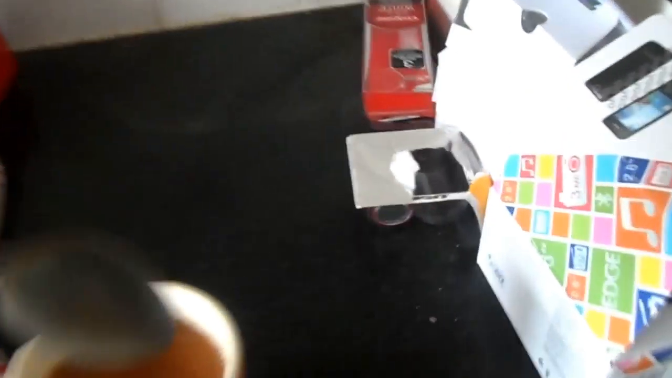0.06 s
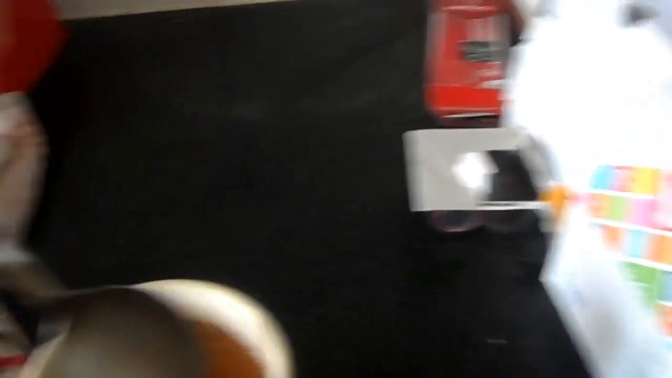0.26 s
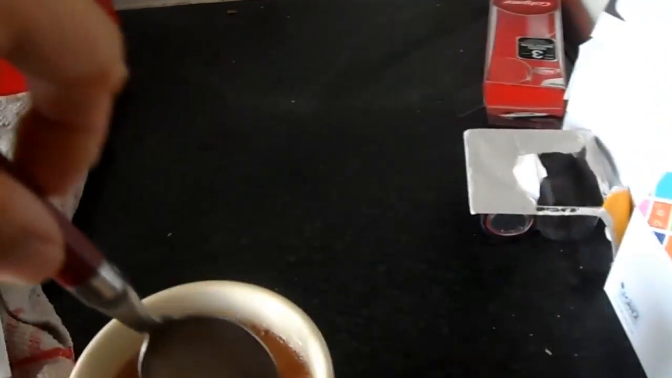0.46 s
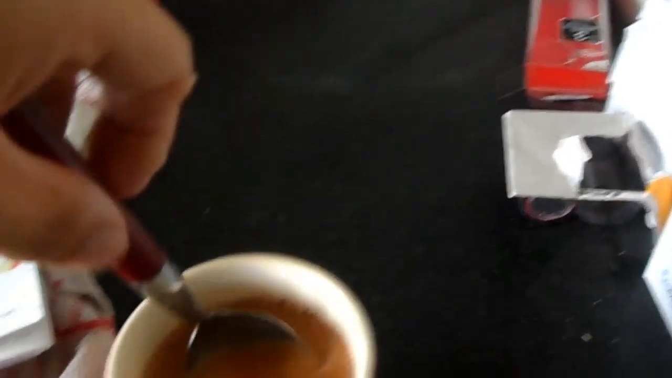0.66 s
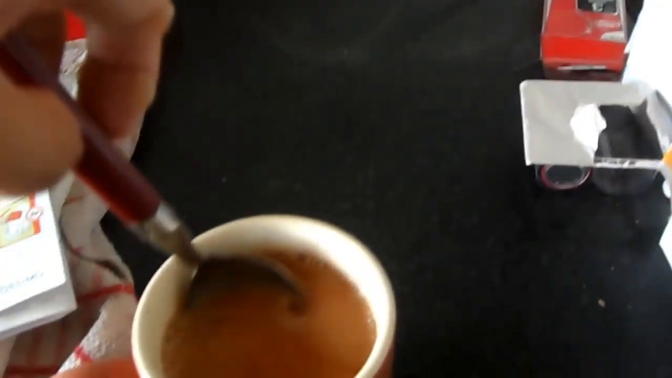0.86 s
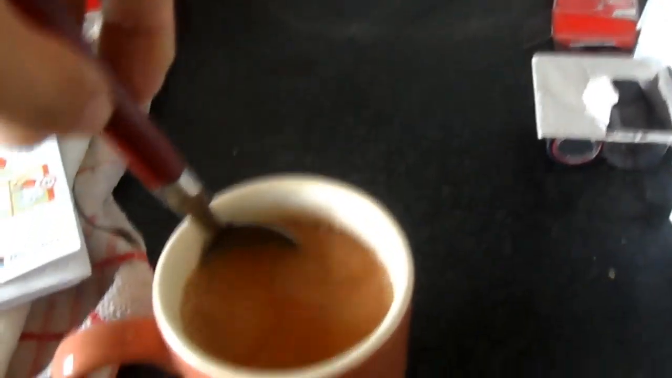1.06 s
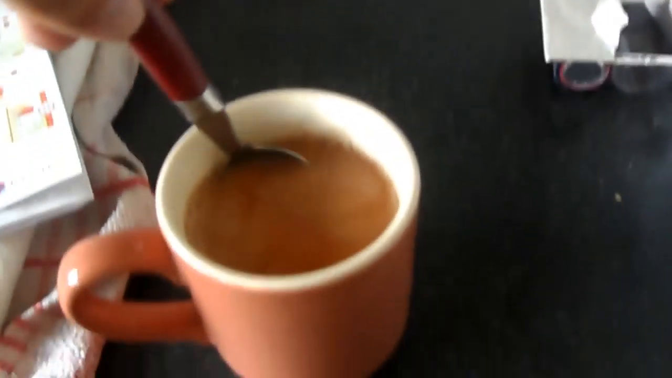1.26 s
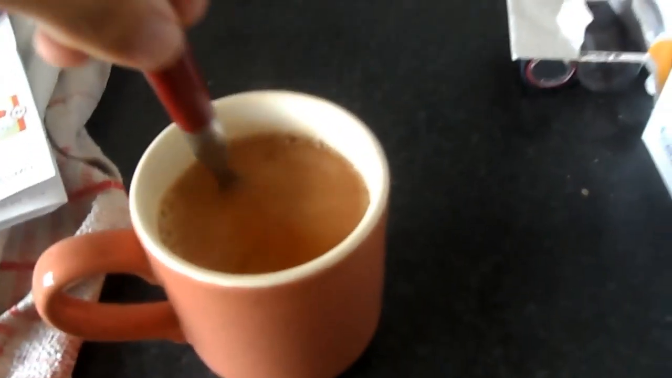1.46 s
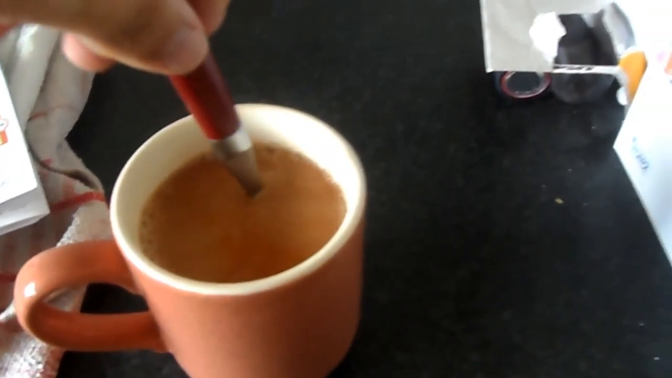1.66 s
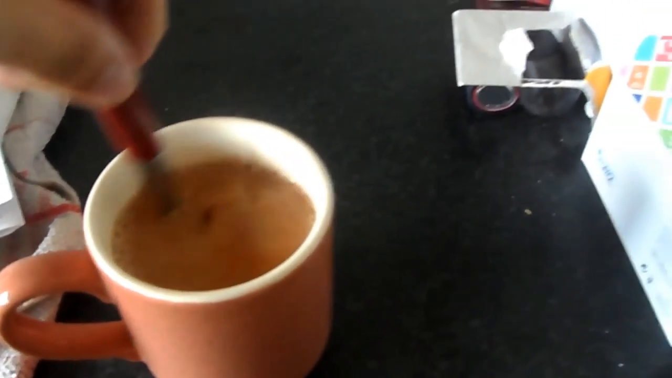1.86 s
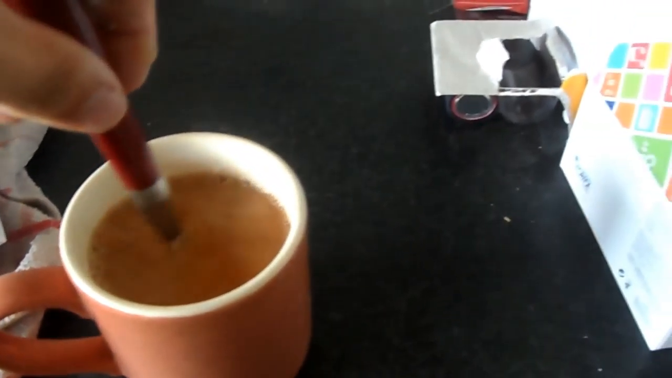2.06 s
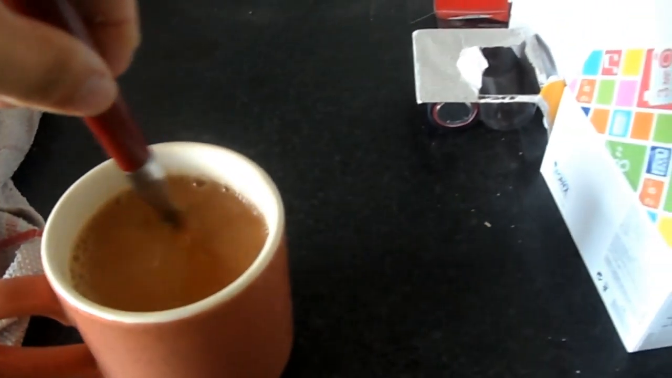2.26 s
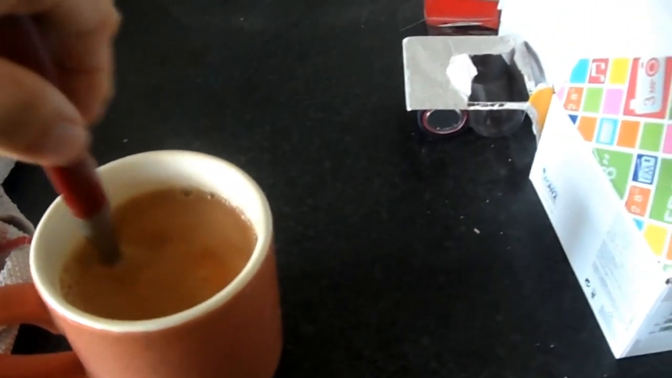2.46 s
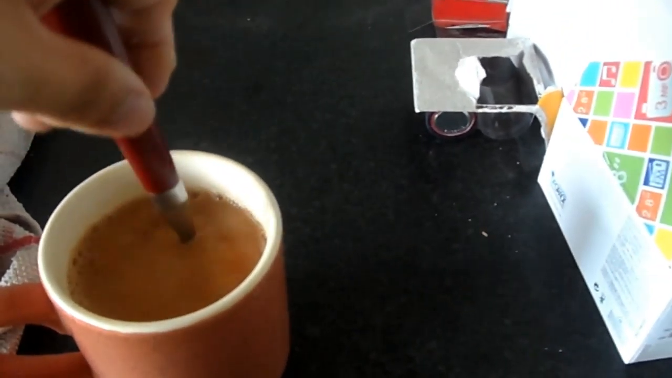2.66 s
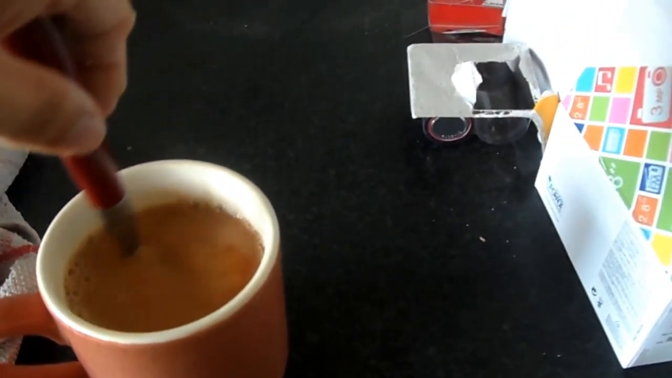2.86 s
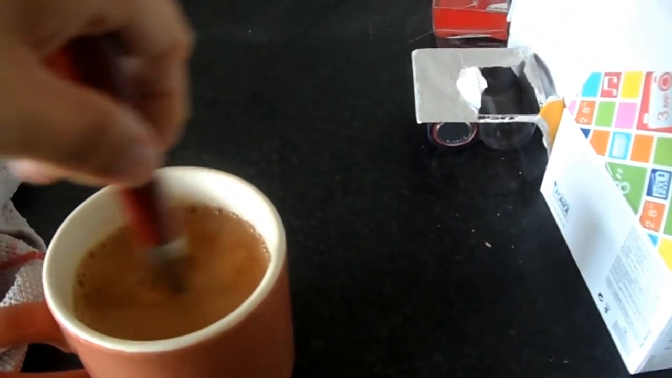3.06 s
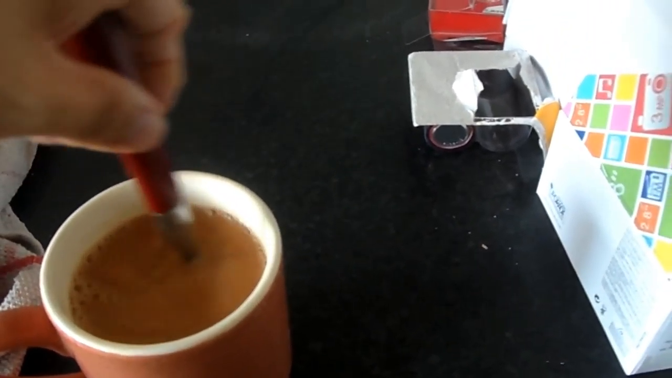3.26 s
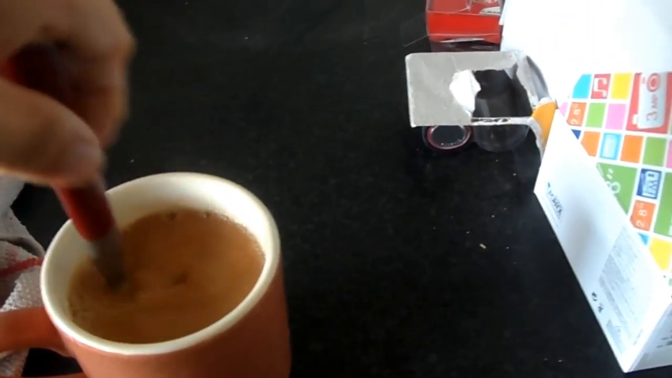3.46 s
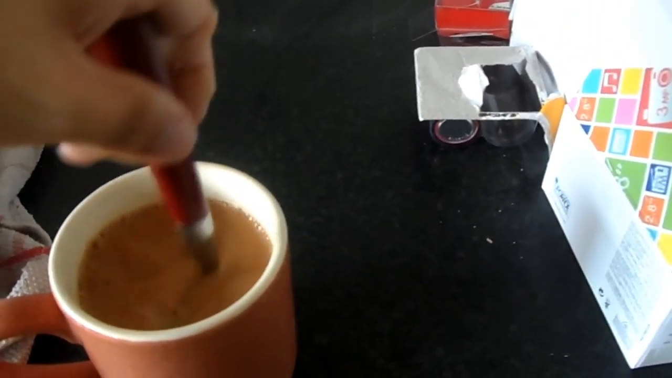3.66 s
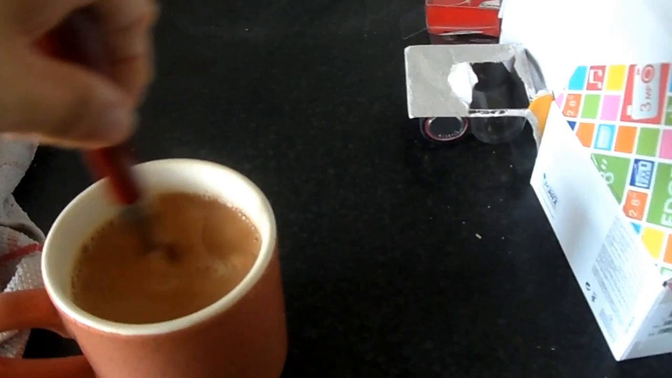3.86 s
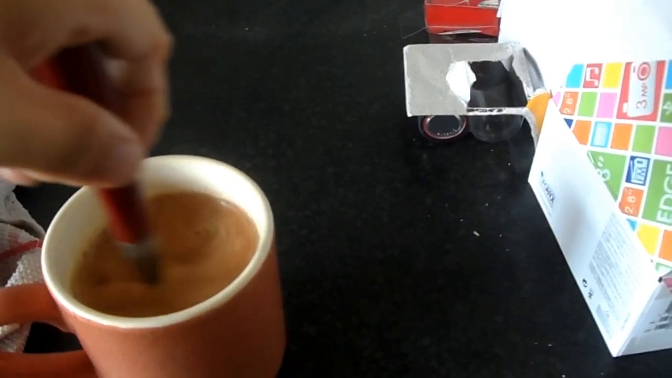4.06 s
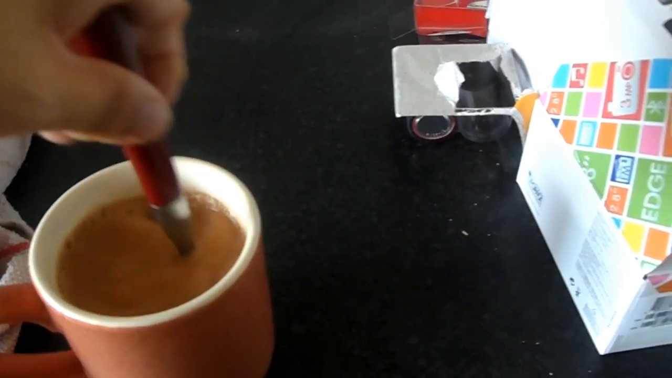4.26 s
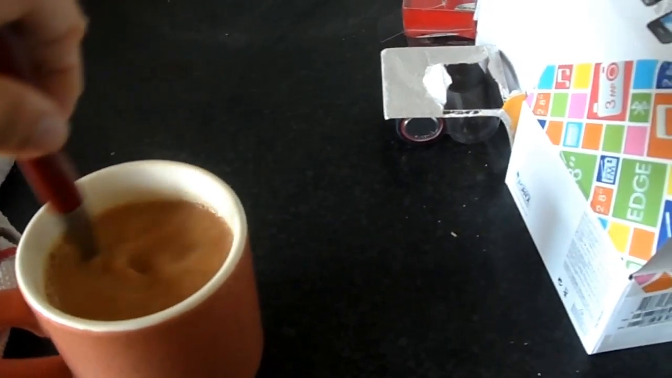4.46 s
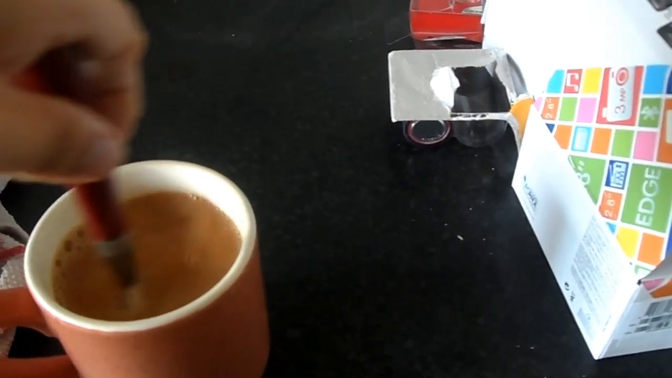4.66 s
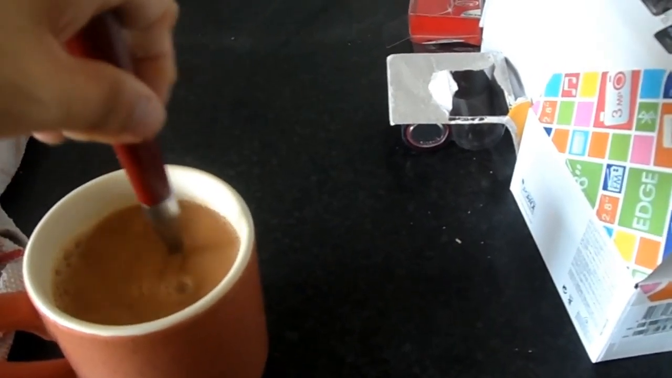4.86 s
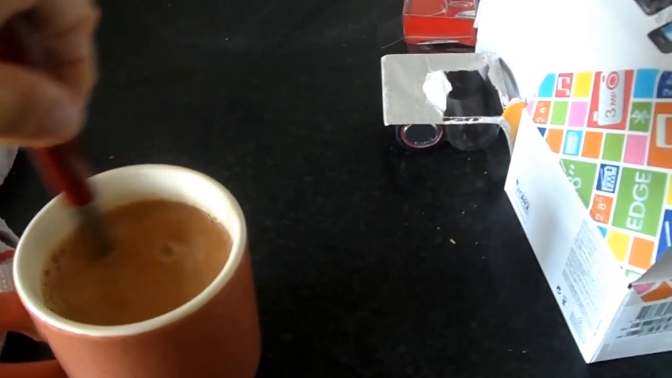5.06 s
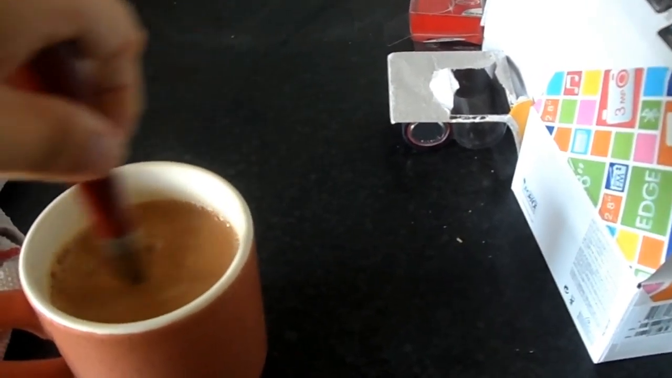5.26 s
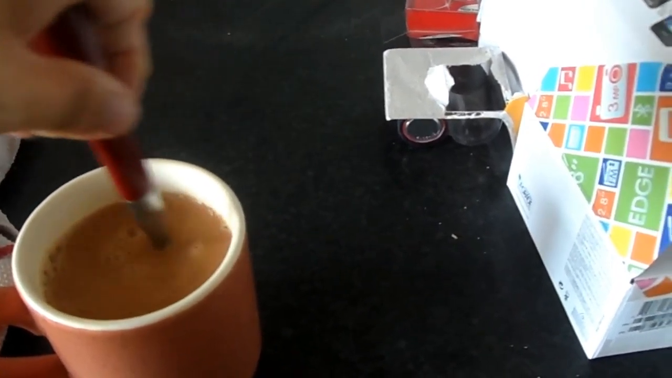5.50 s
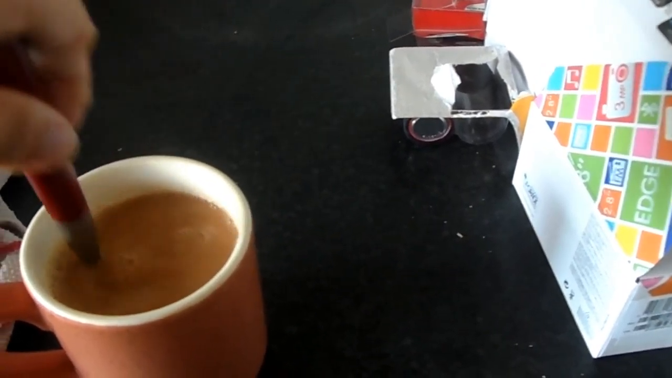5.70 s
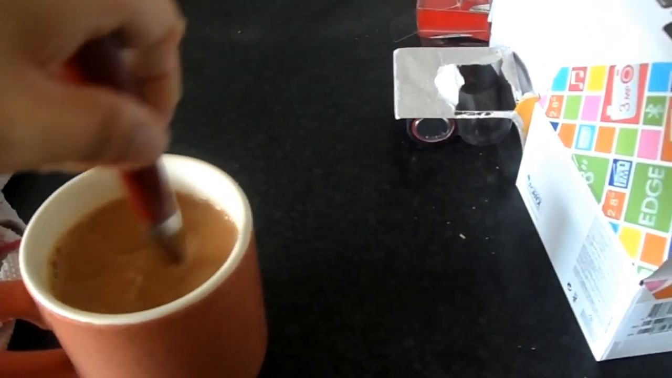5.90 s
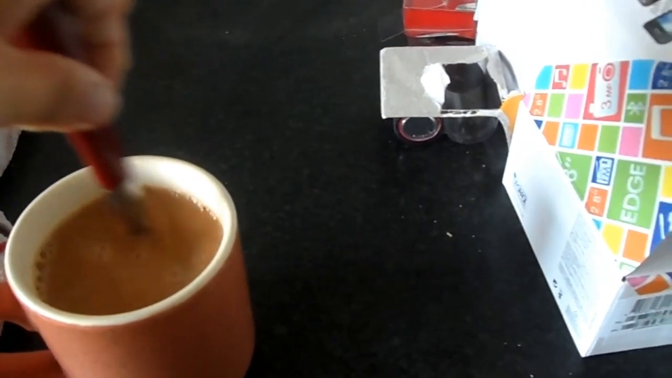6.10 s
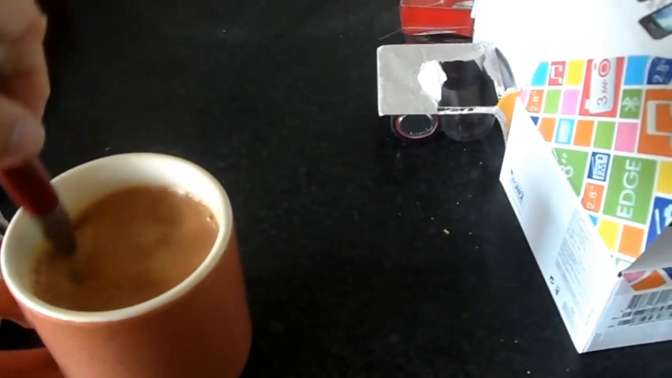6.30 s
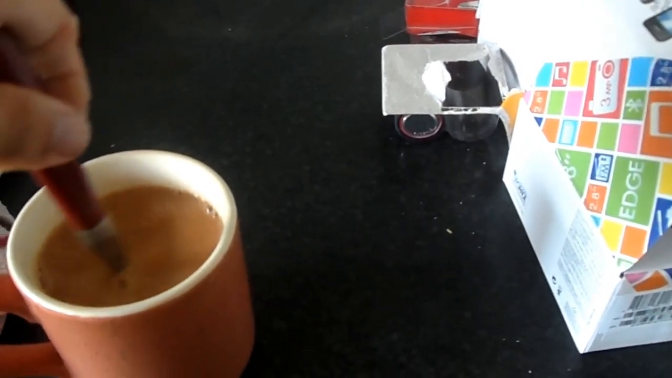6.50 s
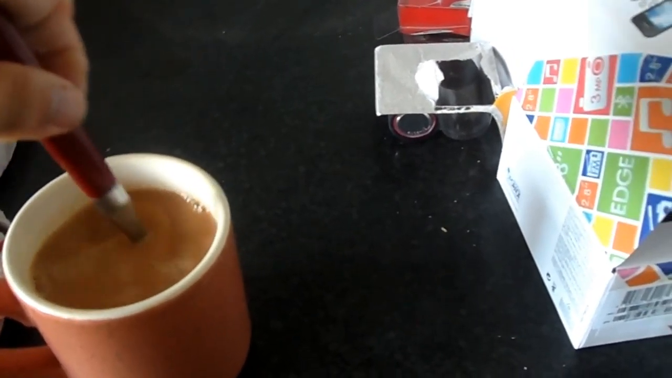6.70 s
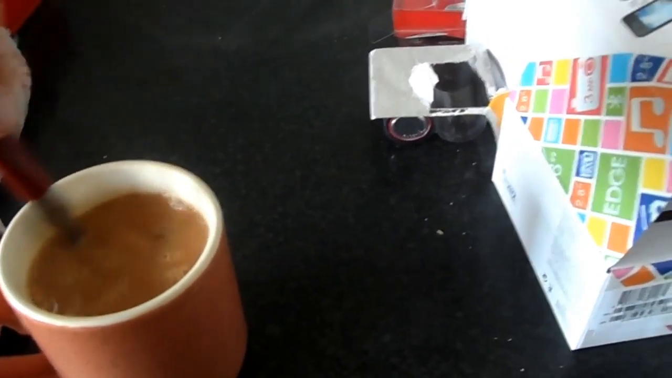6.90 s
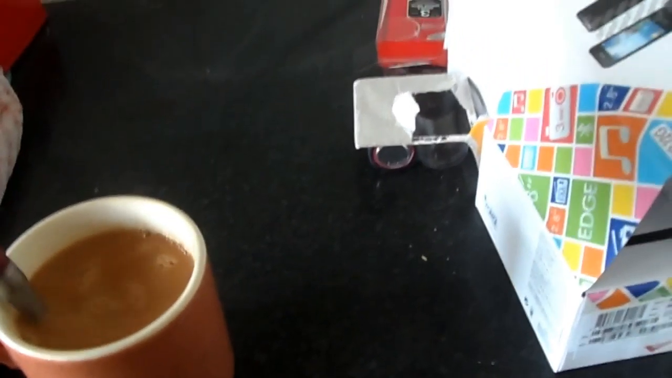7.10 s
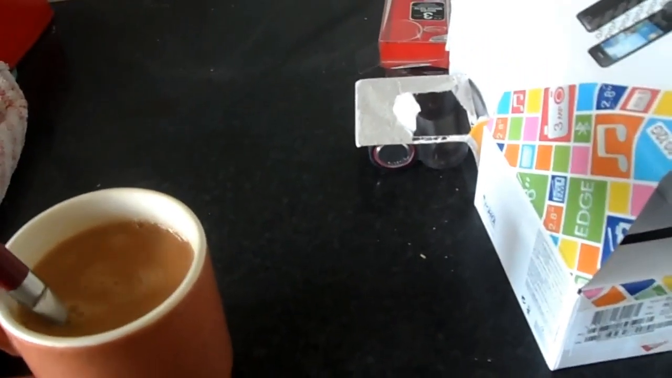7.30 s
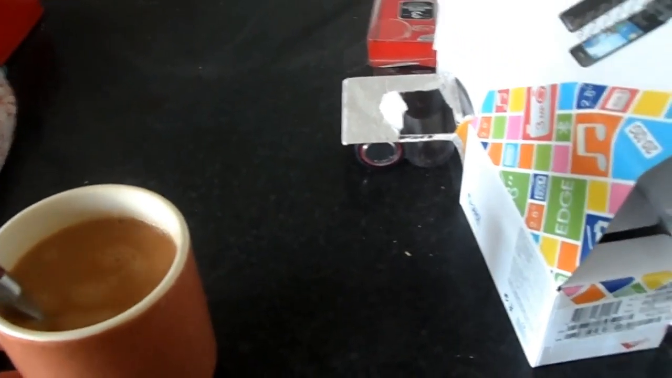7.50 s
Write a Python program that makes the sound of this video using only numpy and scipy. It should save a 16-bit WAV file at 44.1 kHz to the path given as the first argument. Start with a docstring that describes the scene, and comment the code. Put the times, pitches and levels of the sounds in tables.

```python
"""A teaspoon stirs a drink in a ceramic mug in a small kitchen, close to a mono microphone.
Each clink is modal synthesis: dying sines of mug and spoon, weighted by where the blow lands, with a noisy
crack and a rasping drag. Resonated blips and coloured noise make the drink gurgle and wash.
Before it, handling rustles and a growing rumble lead to a dull knock on the low modes of the house.
Filtered noise gives room hum, throbbing insects outside and faint wavering tones throughout."""
import sys
import numpy as np
from scipy import signal
from scipy.fft import rfft, irfft
from scipy.io import wavfile
from scipy.ndimage import uniform_filter1d

SR = 44100
rng = np.random.default_rng(int(sys.argv[2]) if len(sys.argv) > 2 else 0)


def inscribe(sig):
    """Save sig as 16-bit PCM at rate SR to the path in sys.argv[1].

    A 1-D sig is mono; a 2-D sig holds one channel per row.
    Samples are clipped to [-1, 1] before scaling.
    """
    pcm = np.round(np.clip(np.atleast_2d(sig).T, -1, 1) * 32767)
    wavfile.write(sys.argv[1], SR, pcm.astype(np.int16))


N = 332514


def gain_of(db):
    """Level law: decibels to an amplitude factor."""
    return 10 ** (np.asarray(db) / 20)


def evened(x):
    """Normalization: scales a signal to rms 1."""
    return x / np.sqrt(np.mean(x ** 2) + 1e-20)


def read(points, hz):
    """Interpolation: reads a table on a log-frequency axis."""
    f, value = np.transpose(points)
    return np.interp(np.log(hz + 1), np.log(f + 1), value)


def noise(colour):
    """Spectral shaping: white noise filtered to a given spectrum, silent outside it, rms 1."""
    hz = np.fft.rfftfreq(N, 1 / SR)
    inside = (hz >= colour[0][0]) & (hz <= colour[-1][0])
    spectrum = rfft(rng.standard_normal(N)) * gain_of(read(colour, hz)) * inside
    return evened(irfft(spectrum, N))


def ring(x, hz, t60):
    """Damped resonance: a two-pole mode turns a unit click into a dying sine of height 1."""
    r, w = 10 ** (-3 / (t60 * SR)), 2 * np.pi * hz / SR
    return signal.lfilter([0, np.sin(w)], [1, -2 * r * np.cos(w), r * r], x)


def strike(s, db):
    """Impulsive excitation: a train of clicks."""
    x = np.zeros(N)
    x[np.round(np.asarray(s) * SR).astype(int)] = gain_of(db)
    return x


def fading(x, t60):
    """Exponential decay: a one-pole filter turns each click into a falling envelope."""
    return signal.lfilter([1], [1, -10 ** (-3 / (t60 * SR))], x)


def burst(s, db, rise_s, t60):
    """Rise and decay: an envelope with a straight rise, then a steady fall in dB."""
    t = np.arange(N) / SR - s
    rise = np.clip(t / max(rise_s, 1e-3), 0, 1)
    return rise * gain_of(db - 60 * np.maximum(t - rise_s, 0) / t60)


def add(mix, s, sound):
    """Superposition: mixes a sound in at a moment."""
    part = mix[round(s * SR):][:len(sound)]
    part += sound[:len(part)]


# room hum spectrum: f/Hz, relative spectral level/dB
HUM_SPECTRUM = [(12, -36.5), (20, -2.5), (55, -2.5), (76, -18.5), (113, -14), (203, -21.5), (240, -26),
                (355, -26.5), (1600, -38), (2120, -37.5), (3310, -40.5), (5620, -41), (15800, -45.5)]
# insect bands: f/Hz, width/Hz, level/dB
INSECT_BANDS = [(5140, 700, -74.5), (6300, 190, -69)]
# faint wavering tones: f/Hz, width/Hz, level/dB
FAINT_TONES = [(50, 39, -51), (2096, 110, -65.5), (2683, 5.7, -73.5), (11300, 30, -75)]
HUM_DB, THROB_HZ = -48, 22.7


def narrow_bands(bands, ring_factor):
    """Resonant filtering: noise through narrow modes wavers, more slowly the longer they ring."""
    return sum(gain_of(db) * evened(ring(rng.standard_normal(N), hz, ring_factor / width))
               for hz, width, db in bands)


def background():
    """Stationary noise: shaped hum and faint tones, with insect bands under amplitude modulation."""
    t = np.arange(N) / SR
    throb = (.5 + .5 * np.cos(2 * np.pi * THROB_HZ * t + .3)) ** 1.5
    insects = narrow_bands(INSECT_BANDS, 2.2) * evened(throb)
    tones = narrow_bands(FAINT_TONES, 2.9)
    return gain_of(HUM_DB) * noise(HUM_SPECTRUM) + insects + tones


# handling rustles: t/s, rise/s, rattle level/dB, hiss level/dB
RUSTLE_EVENTS = [(0.01, 0.042, -51, -49.5), (0.221, .005, -47, -45.5), (.285, 0.024, -54.5, -65)]
# low modes of the house: f/Hz, level relative to the blow/dB, T60/s
HOUSE_MODES = [(65, -5.5, 0.41), (145.5, 3.5, 0.24), (394, -32, 0.64), (552, -25.5, 0.4), (729, -18.5, 0.3),
               (924, -13.5, 0.25), (1614, -34, 0.37), (1920, -24.5, 0.33)]
# spectra of boom, rattle and hiss: f/Hz, relative spectral level/dB
BOOM_SPECTRUM = [(15, -70), (25, -14), (59, -3.5), (98, -5), (145, -4), (188, -10.5), (300, -14.5),
                 (390, -71), (660, -120)]
RATTLE_SPECTRUM = [(180, -81), (300, -4.5), (420, -2.5), (505, -10), (916, -9), (967, -9.5), (2920, -14),
                   (4000, -23), (5200, -23), (8800, -120)]
HISS_SPECTRUM = [(2120, -3), (3600, -7), (6230, -4), (8630, -5.5), (10100, -4), (13000, -11), (16000, -25)]
KNOCK_S, KNOCK_DB = .410, -2.5


def knock():
    """Modal excitation: one blow on the house, with boom, rattle and hiss; rustles and rumble precede it."""
    blow, t = strike([KNOCK_S], KNOCK_DB), np.arange(N) / SR - KNOCK_S
    swell = 1 - 0.89 * np.exp(-np.maximum(t, 0) / 0.02)  # the modes take a moment to swell
    modes = sum(gain_of(db) * ring(blow, hz, t60) for hz, db, t60 in HOUSE_MODES) * swell
    slap = noise(RATTLE_SPECTRUM) * fading(blow, 0.018) * gain_of(-9.5)
    rumble = gain_of(-35 + 25.5 * np.minimum(t, 0)) * (t < 0)  # grows 25.5 dB a second up to the knock
    boom = rumble + burst(KNOCK_S, db=-11.5, rise_s=0.013, t60=0.32)
    boom += burst(KNOCK_S, db=-38, rise_s=.05, t60=1.5)  # long after-boom
    rattle = burst(KNOCK_S, db=-15.5, rise_s=0.0032, t60=0.33)
    rattle += burst(KNOCK_S, db=-54, rise_s=0.054, t60=1.5)  # long after-rattle
    hiss = burst(KNOCK_S, db=-37, rise_s=0.0035, t60=0.16)
    hiss += burst(KNOCK_S, db=-30.5, rise_s=0.068, t60=0.31)  # late hiss
    for s, rise_s, rattle_db, hiss_db in RUSTLE_EVENTS:
        rattle += burst(s, rattle_db, rise_s, t60=0.5)
        hiss += burst(s, hiss_db, rise_s, t60=0.35)
    noises = noise(BOOM_SPECTRUM) * boom + noise(RATTLE_SPECTRUM) * rattle + noise(HISS_SPECTRUM) * hiss
    return modes + slap + noises


# how hard the drink is stirred up: t/s, relative level/dB
STIRRING = [(1.2, -79), (1.4, -67.5), (2.2, -67), (4.5, -52), (4.75, -51.5), (5.0, -56), (7.54, -52)]
# the spoon throws the drink at the wall: t/s, relative level/dB
WALL_SPLASHES = [(1.28, -50), (2.21, -37.5), (4.8, -36.5)]
# air pockets in the drink: f/Hz, width/Hz, relative level/dB
AIR_POCKETS = [(260, 42, 1.5), (431, 350, -13.5), (522.5, 39, -4.5), (744, 93, -4.5)]
# wash of the drink: f/Hz, relative spectral level/dB
WASH_SPECTRUM = [(120, -40.5), (200, -4), (337, -31), (501, -9.5), (643, -11), (1370, -9.5), (1660, -10),
                 (2090, -16.5), (3000, -33), (3900, -46.5), (6600, -120)]
SEEDS_PER_S, SEED_SPREAD_DB = 45, 5  # each air pocket answers about two seeds in three


def slosh():
    """Cavity resonance: random blips ring air pockets over a soft wash as the spoon turns."""
    seed_db = SEED_SPREAD_DB * np.minimum(rng.exponential(1, N), 3)
    seeds = gain_of(seed_db) * (rng.random(N) < SEEDS_PER_S / SR)
    gurgle = np.zeros(N)
    for hz, width, db in AIR_POCKETS:
        blips = seeds * rng.choice([-1, 0, 1], N)
        pocket = ring(ring(blips, hz, 1.8 / width), hz, 0.019)  # two resonators in a row round the onset
        gurgle += gain_of(db) * evened(pocket)
    at, level_db = np.transpose(STIRRING)
    stir = gain_of(np.interp(np.arange(N) / SR, at, level_db, left=-120, right=-120))
    stir += sum(burst(s, db, rise_s=0.012, t60=0.24) for s, db in WALL_SPLASHES)
    return (evened(gurgle) * gain_of(-2.0) + noise(WASH_SPECTRUM) * gain_of(-6.5)) * stir


PRESS_S, FREE_LENGTH = 0.057, 0.78  # the spoon then lets go, and the length factor is at least this


def dying(modes, t, length):
    """Modal decay: a sum of dying sines. Each mode's pitch and level vary slightly at random from blow
    to blow, and a close, weaker partner at a random spacing makes it beat."""
    hz, db, t60 = np.transpose(modes)[:, :, None]
    shift, weight, sign, split = rng.standard_normal((4, len(modes), 1))
    hz, db = hz * (1 + .0012 * shift), db + 1.5 * weight
    pressed = np.minimum(t, PRESS_S)
    scaled_s = pressed / max(length, .1) + (t - pressed) / max(length, FREE_LENGTH)
    fall = gain_of(-60 / t60 * scaled_s)
    partner = 0.3 * fall * np.sin(2 * np.pi * hz * (1 + 0.0056 * split) * t)
    pair = np.sin(2 * np.pi * hz * t) + partner
    return (np.sign(sign) * gain_of(db) * fall * pair).sum(0)


NODE_DB = -28  # what still rings at a node, as the contact is not a point


def rung(shapes, db, place_deg, share):
    """Mode shapes: a family rings loud for a blow at its crests and faint at its nodes."""
    waves, crest_deg, base_db, gained_db = np.transpose(shapes)
    crest = np.cos(waves * np.radians(place_deg - crest_deg))
    return db + base_db + gained_db * share + 10 * np.log10(crest ** 2 + gain_of(NODE_DB) ** 2)


# blows: t/s, crack level/dB, jolt of the mug on the counter level/dB, mug level/dB, place round wall/deg,
# height on wall (0 low - 1 rim), spoon level/dB, place round rim of its bowl/deg,
# lean (0 edge first - 1 flat), drag level after the blow/dB, ring length factor while the spoon is pressed;
# all levels are relative
BLOWS = [(1.287, -15.5, -39, -21.5, 288.0, 1, -46, 186.0, 0, -49, 0.76),
         (1.951, -13.5, -43.5, -18, 290.0, 0.46, -24, 324.0, 0.29, -25.5, 0.51),
         (2.2105, -1.0, -27, -15.5, 42.0, 0.011, -20.3, 346.0, 0.19, -28, 0.33),
         (2.2346, -33, -30, -26.5, 2.9, 0.26, -33.5, 4.0, 0.55, -27, 0.88),
         (2.4601, -2, -38, -16, 9.2, 0.34, -20.5, 144.0, 0.18, -25.5, 0.53),
         (2.7086, -8, -33, -19, 140.5, 0.41, -20.5, 6.5, 0.088, -26.5, 0.37),
         (2.7343, -38, -33.0, -25, 213, 0, -30, 198.0, 0.89, -29, 0.69),
         (2.942, -2, -35, -12, 66.7, 0.49, -21.5, 287, 0.27, -25, 0.82),
         (3.0938, -32.5, -37, -24.5, 108.0, 0.76, -29.5, 22.5, 0.85, -18, 0.35),
         (3.412, -5, -37, -6.5, 317.0, 0.77, -24.5, 90, 0.12, -24.5, 0.58),
         (3.6324, -49.0, -74, -43, 113, 0.44, -49.5, 123, 0.87, -21.0, 1),
         (3.707, -8.5, -37.5, -20, 31.6, 0.13, -25.0, 186.0, 0.4, -27, 0.96),
         (3.7424, -16.5, -35, -26, 312.0, 0.15, -35, 54, 0.93, -30, 0.96),
         (3.8185, -22, -38.5, -35.5, 110, 0.29, -48, 85, 0.66, -36, 0.3),
         (3.9646, -5, -31.5, -4, 38.7, 0.69, -22, 155.5, 0.072, -25.5, 0.42),
         (4.148, -26.5, -38, -30, 284.0, 0.58, -35.5, 244.0, 0.62, -28, 0.31),
         (4.2198, -8, -30, -14.5, 316.0, 0.29, -16.5, 93.5, 0.74, -27, 0.38),
         (4.2439, -30, -34.5, -23, 100, 0.15, -38, 332.0, 0.72, -41, 0.87),
         (4.4292, -13.5, -28.5, -19.5, 288.0, 0.44, -34, 108.0, 0.56, -29.5, 0.4),
         (4.4476, -4.0, -49, -10.5, 38.9, 0.55, -28.5, 320, 0.49, -25, 0.48),
         (4.5107, -32, -31, -28.5, 240, 0.58, -39.5, 152.0, 0.37, -21.5, 0.28),
         (4.6686, -34.5, -34, -24.5, 290.0, 0.66, -33.5, 104.0, 0.066, -20.5, 0.14),
         (4.78, -5.5, -26, -18, 41, 0.1, -17, 200.0, 0.51, -27.5, 0.27),
         (4.8094, -36, -27.5, -18, 286.0, 0.7, -36.5, 53, 0.49, -24, 0.52),
         (5.1558, 0.5, -29.5, 0, 114.0, 0.48, -15.5, 98, 0.25, -27, 0.43),
         (5.409, -3.5, -28, -17.4, 316.0, 0.16, -15.5, 197, 0.43, -32, 0.49),
         (5.5082, -11.5, -34.5, -22.5, 104.0, 0.9, -36.5, 142, 0.4, -24.5, 0.66),
         (5.674, -0.5, -35, -2.5, 210.0, 0.57, -14, 150, 0.057, -27.5, 0.39),
         (5.9314, -11.5, -29, -14, 37.6, 0.14, -15.5, 198.2, 0.39, -24, 0.58),
         (6.0286, -11.5, -29.5, -19.5, 282.0, 0.41, -33, 166.0, 0.73, -26.5, 0.22),
         (6.2112, -3, -32.5, -5.5, 77.5, 0.6, -17.5, 216, 0.46, -26.5, 0.35),
         (6.5165, -5.5, -33, -24, 264.0, 0.6, -26.5, 18.0, 0.26, -25, 0.46),
         (6.596, -23, -34.5, -33, 11, 0.55, -37, 152.0, 0.5, -26, 0.24),
         (6.6664, -46, -34.5, -32, 288.0, 0.81, -46.5, 256.0, 1, -21, 0.31),
         (6.78, -40.5, -31, -44.5, 110, 0.9, -61.5, 320, 0.65, -28.5, 0.24),
         (6.9274, -12, -37, -11, 79, 0.65, -21.5, 29, 0.75, -27.5, 0.38),
         (7.0879, -26, -37.5, -23.5, 286.0, 0.78, -38.5, 97, 0.36, -19.0, 0.32),
         (7.2562, -6, -46, -22.1, 154.0, 0.93, -36.5, 88.0, 0.41, -27.5, 0.53),
         (7.2994, -26, -49, -32.3, 156.0, 0.75, -45, 200, 0.34, -22, 0.76),
         (7.3865, -42.0, -42.5, -43, 168.0, 0.57, -53.5, 285, 0.5, -13.5, 0.76),
         (7.4283, -23, -44, -40, 348.0, 0.63, -53, 260, 0.57, -39, 0.27),
         (7.4572, -50.0, -26, -39, 286.0, 0.77, -52.8, 71, 0.73, -23.0, 0.3)]
# families of mug modes, each rung together from one spot: f/Hz, relative level/dB, T60 before length factor/s
MUG_MODES = [
    [(1521, 2, .32)],
    [(1653, 2, .55)],
    [(3888, 3, .4), (3865, -4, .18)],
    [(4588, -3, .22), (4748, -12, .13), (6385, -5, .22), (7068, 1, .26), (10642, -6, .14)],
    [(6296, -4, .2), (6910, -2, .22), (6885, -10, .35), (7000, -12, .2), (8376, -26, .2)],
    [(7889, 1, .26), (7946, -8, .3), (7990, -10, .25)],
]
# families of spoon modes, deep in the drink: f/Hz, relative level/dB, T60 before length factor/s
SPOON_MODES = [
    [(2296, 0, .2), (7270, -4, .24), (7420, -8, .3), (7522, -2, .3)],
    [(3120, -8, .12), (3200, 0, .38)],
    [(3617, 0, .2)],
    [(5135, -2, .17), (5205, -3, .2)],
    [(8035, 1, .26), (9012, -4, .18), (9275, -5, .22), (9690, -6, .2), (9960, -2, .24), (10170, -8, .25)],
    [(10930, -6, .2), (11155, -6, .2), (11280, -5, .2), (11540, -6, .2), (11780, -10, .24),
     (12200, -8, .16), (12780, -14, .17), (13350, -17, .2), (13850, -19, .2), (14500, -18, .2),
     (15300, -22, .1)],
]
# one row a mug family: waves round the wall, first crest/deg, level low on wall/dB, gain up to rim/dB
MUG_MODE_SHAPES = [(2, 80.4, -1.34, -21.5), (2, 14.5, -36.5, 22.5), (3, 15.1, -0.5, -15),
                   (3, 23.2, -28, 26), (4, 39.1, -7.5, 12.5), (4, 5.5, 2.6, -21)]
# one row a spoon family: waves round the bowl, first crest/deg, level edge first/dB, gain when flat/dB
SPOON_MODE_SHAPES = [(2, 2.5, -10, 4), (2, 71.2, -6, 7), (3, 43, 2.5, -19.5), (3, 50.7, -5.5, 13),
                     (4, 1.4, -5, -4.5), (4, 35.5, 12, -27)]
# the full mug jolted on the counter: f/Hz, relative level/dB, T60 before length factor/s
ROCKING_MODES = [(409.4, -4, 0.14), (471.5, 0.5, 0.19), (283, -11.5, 0.2), (176.5, 0.5, 0.085),
                 (126, -10.5, 0.31)]


def ringing_bodies():
    """Modal superposition: each blow rings mug and spoon by where it lands, and tiny slips ring them on."""
    out, t = np.zeros(N), np.arange(SR // 2) / SR
    for s, _, jolt_db, mug_db, wall_deg, height, spoon_db, rim_deg, lean, drag_db, length in BLOWS:
        mug_levels = rung(MUG_MODE_SHAPES, mug_db, wall_deg, height)
        spoon_levels = rung(SPOON_MODE_SHAPES, spoon_db, rim_deg, lean)
        families = zip([*mug_levels, *spoon_levels], MUG_MODES + SPOON_MODES)
        body = sum(gain_of(db) * dying(modes, t, length) for db, modes in families)
        rise = 1 - np.exp(-t / 0.003)  # the heavy mug takes a moment to rock
        body = body + gain_of(jolt_db) * dying(ROCKING_MODES, t, length) * rise
        body = body * (1 - np.exp(-t / 0.00043))  # the contact lasts about a millisecond
        slips = rng.standard_normal(len(t)) * (rng.random(len(t)) < .04)
        slips *= gain_of(drag_db - 3.0 - 60 * t / 0.34)
        add(out, s, body + signal.fftconvolve(slips, body)[:len(t)])
    return out


# spoon with only its tip wet rings higher: f/Hz, level relative to the crack setting/dB,
# T60 before length factor/s
SPOON_TIP_MODES = [(2450, -30, 0.25), (3520, -18.5, 0.18), (5640, -15.5, 0.13), (9000, -21, 0.31),
                   (9480, -26, 0.45), (13700, -25, 0.17)]


def wet_tip():
    """Added mass: at the first blow only the tip of the spoon is wet, so it rings higher."""
    out, t = np.zeros(N), np.arange(SR // 2) / SR
    s, crack_db = BLOWS[0][:2]
    add(out, s, gain_of(crack_db) * dying(SPOON_TIP_MODES, t, length=0.66))
    return out


# bright edge of a hard contact: f/Hz, relative spectral level/dB
SIZZLE_SPECTRUM = [(8500, -24.5), (10000, 11), (12000, 10), (14000, -8), (16500, -20)]


def crack(contact_noise):
    """Broadband impact: a short crack, and a sizzle that follows the highest family of spoon modes."""
    s, crack_db, *_ = np.transpose(BLOWS)
    top_db = np.array([rung(SPOON_MODE_SHAPES, *blow[6:9])[-1] for blow in BLOWS])
    sizzle = noise(SIZZLE_SPECTRUM) * fading(strike(s, top_db + 4.0), 0.032)
    return contact_noise * fading(strike(s, crack_db - 17.5), 0.016) + sizzle


RASP_FROM_SPOON = 0.59  # share of the rasp level that follows the spoon's ring; the rest follows the crack


def rasp(contact_noise):
    """Stick-slip friction: the drag along the glaze catches in jerks."""
    s, crack_db, *_, spoon_db, _, _, drag_db, _ = np.transpose(BLOWS)
    catches = rng.standard_normal(N) ** 2 * (rng.random(N) < 400 / SR)  # about 400 a second
    jerks = evened(fading(catches, 0.055) + 0.55)
    level_db = crack_db + RASP_FROM_SPOON * (spoon_db - crack_db) + drag_db + 4.0
    return contact_noise * jerks * fading(strike(s, level_db), 0.35)


# noise shared by crack and rasp: f/Hz, relative spectral level/dB
CONTACT_SPECTRUM = [(300, -39.5), (1000, -5), (2500, -10.5), (5000, -4), (8000, -1.5), (10000, -17.5),
                    (14000, -23)]


def clinks():
    """Impact and friction: ringing bodies, with the crack of contact and the rasp of the drag."""
    contact_noise = noise(CONTACT_SPECTRUM)
    return ringing_bodies() + wet_tip() + crack(contact_noise) + rasp(contact_noise)


# decay of the kitchen's reverberation: f/Hz, T60/s
KITCHEN_DECAY = [(300, 0.34), (2000, 0.19), (6000, 0.15), (15000, 0.19)]


def kitchen(x):
    """Reverberation: sparse taps of random sign, each band dying at its own speed."""
    taps = np.zeros(SR // 2)
    at = np.arange(120, SR // 2 - 20, 20)
    taps[at + rng.integers(0, 20, len(at))] = rng.choice([-1., 1.], len(at))
    hz, t, bands = signal.stft(taps, SR, nperseg=256)
    decay = gain_of(-60 * t / read(KITCHEN_DECAY, hz)[:, None])
    tail = signal.istft(bands * decay, SR, nperseg=256)[1]
    return signal.fftconvolve(x, tail / np.linalg.norm(tail))[:N]


def scene():
    """Superposition: all sources at one microphone, copied to both channels."""
    mug = clinks()
    mix = background() + knock() + slosh() + mug + gain_of(-5) * kitchen(mug)
    return np.tile(mix, (2, 1))


EDGE_HZ, CLIP = 16500, .93


def record(dry):
    """Dynamic compression: gain control ducks everything at and after loud sounds.
    The deepest bass is dropped first; then peaks clip and a low-pass limits the band."""
    power_db = 10 * np.log10(abs(uniform_filter1d(dry[0] ** 2, size=400)) + 1e-12)
    fall = np.arange(N) * 16.0 / SR  # the held level falls 16 dB a second
    held_db = np.maximum.accumulate(power_db + fall) - fall
    over_db = np.maximum(held_db + 17.5, 0)  # excess above -17.5 dB
    duck = gain_of(0.19 * uniform_filter1d(over_db, size=200))
    bass_cut = signal.butter(3, 36, "high", fs=SR, output="sos")
    ducked = np.clip(signal.sosfilt(bass_cut, dry) / duck, -CLIP, CLIP)
    edge = signal.firwin(511, EDGE_HZ, window=("kaiser", 11), fs=SR)
    return signal.oaconvolve(ducked, edge[None], "same")


dry = scene()
out = record(dry)
inscribe(out)
```